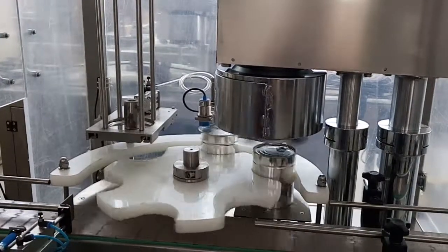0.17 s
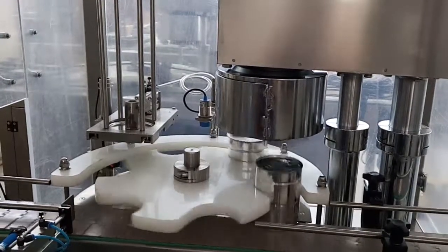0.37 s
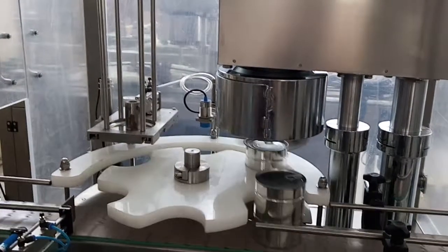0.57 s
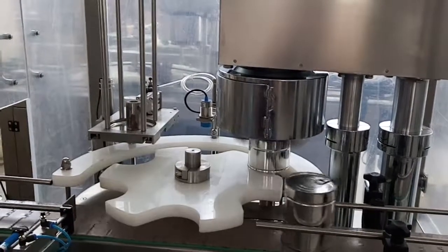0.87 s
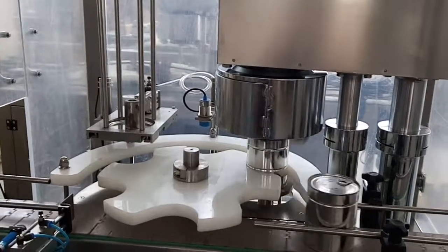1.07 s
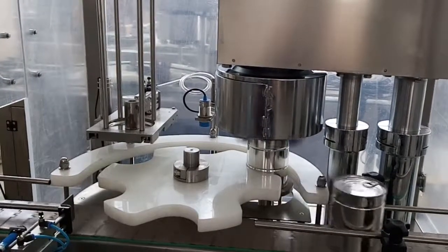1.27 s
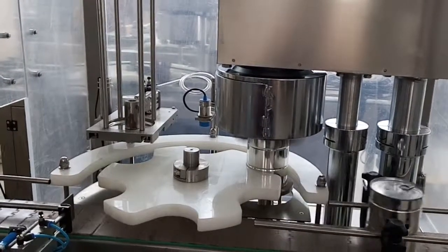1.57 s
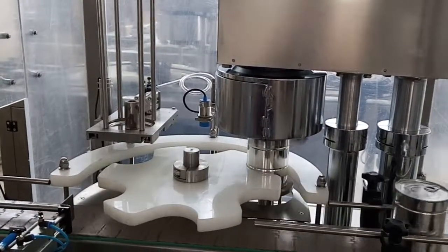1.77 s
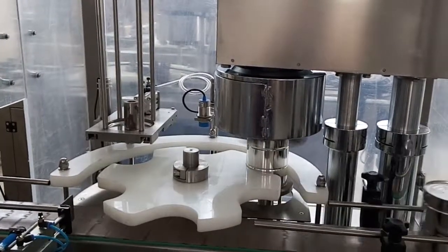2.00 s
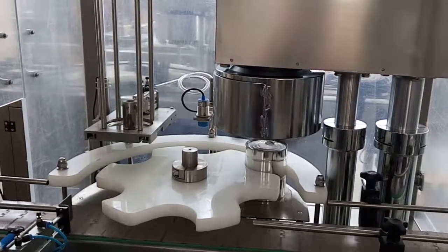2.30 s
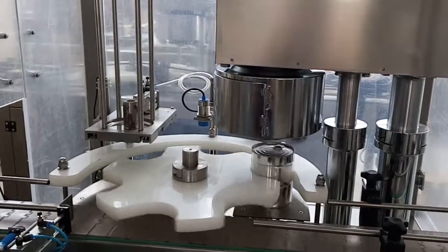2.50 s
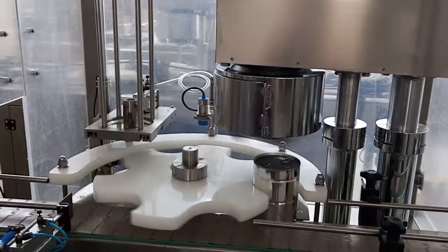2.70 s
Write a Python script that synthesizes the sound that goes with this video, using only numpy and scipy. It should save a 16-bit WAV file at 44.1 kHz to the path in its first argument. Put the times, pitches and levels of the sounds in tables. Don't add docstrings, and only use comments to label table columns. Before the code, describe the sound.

A can seaming machine whirs steadily with motor hum, chatter and air hiss in a reverberant factory hall. Thuds open it; scraping knocks and rim pings come at 0.7 s, a short squeal at 1.3, softer knocks around 1.6. At 2.1 s a can drops with a loud clack, low boom and rattling bounces until 2.4; a squeal follows at 2.6, then a knock and chirp near 2.75.

```python
import sys
import numpy as np
from scipy import signal
from scipy.fft import rfft, irfft, next_fast_len
from scipy.io import wavfile
from scipy.ndimage import uniform_filter1d, map_coordinates

SR = 44100
rng = np.random.default_rng(int(sys.argv[2]) if len(sys.argv) > 2 else 0)


def linear_from_db(decibels):
    return 10 ** (np.asarray(decibels, float) / 20)


def pcm_store(signal):
    levels = np.round(np.clip(np.atleast_2d(signal), -1, 1) * 32767)
    wavfile.write(sys.argv[1], SR, levels.astype(np.int16).T)


N = 125685


def unit(x):
    return x / np.sqrt(np.mean(x ** 2) + 1e-20)


def along(points, hz):
    f, v = np.transpose(points)
    return np.interp(np.log(hz + 1), np.log(f + 1), v)


def curves(rows):
    s, *cols = np.transpose(rows)
    return [np.interp(np.arange(N) / SR, s, c) for c in cols]


def wobble(rate_hz):
    return map_coordinates(rng.standard_normal(int(N * rate_hz / SR) + 4), [np.arange(N) * rate_hz / SR])


def filtered(x, response):
    m = next_fast_len(x.shape[-1] + SR // 2)
    return irfft(rfft(x, m) * response(np.fft.rfftfreq(m, 1 / SR)), m)[..., :x.shape[-1]]


def shaped(x, tone):
    return unit(filtered(x, lambda hz: linear_from_db(along(tone, hz))))


def patchy(patchy_db):
    z = signal.stft(rng.standard_normal((2, N)), nperseg=512)[2]
    field = uniform_filter1d(rng.standard_normal(z.shape[1:]), size=5, axis=0)
    field = uniform_filter1d(field, size=10, axis=1)
    return signal.istft(z * linear_from_db(patchy_db * unit(field)), nperseg=512)[1][:, :N]


def ring(modes, t):
    hz, db, t60_s = np.transpose(modes)[:, None, :, None]
    level_db, detune, phase = rng.standard_normal((3, 2, len(modes), 1))
    walk = np.cumsum(rng.standard_normal((2, len(modes), len(t))), axis=2)
    drift = 0.95 * walk * hz / np.sqrt(20000 * SR)
    spread_rad = [[[.3]], [[2]]]
    tone = np.sin(2 * np.pi * hz * (1 + 0.0035 * detune) * t + drift + phase * spread_rad)
    return (linear_from_db(db + level_db - 60 * t / t60_s) * tone).sum(axis=1)


def rise(t, rise_s):
    return 1 - np.exp(-t / rise_s)


def place(out, s, sound):
    out[:, round(s * SR):][:, :sound.shape[-1]] += sound


# (time [s], whir level [dB], hiss level over its mean [dB])
MACHINE_LOAD = [(0, -29, -1.5), (.2, -30, 0), (.33, -31.5, 2.5), (.5, -30.5, 2), (.85, -31.5, -1.5),
                (1.21, -32, 0.5), (1.69, -32, 0.5), (1.95, -30, 0.5), (2.32, -27, 1), (2.5, -30.5, 1.5),
                (2.85, -30, -1)]
# (frequency [Hz], density [dB per Hz])
RUMBLE_TONE = [(15, -67.5), (25, -23.5), (102, 0), (224, -3.5), (408, -6.5), (537, -9), (810, -9.5),
               (1240, -24), (1500, -17), (1950, -52), (3300, -120)]
# (frequency [Hz], density [dB per Hz])
HISS_TONE = [(1100, -11), (1970, -1), (3350, -1.5), (5370, 0.5), (6700, -12), (7300, -49), (7800, -66.5),
             (15500, -120)]
# (frequency [Hz], width [Hz], level [dB])
FRAME_MODES = [(101, 15, -5.5), (200.4, 6.7, 0.5), (296, 22, 7), (410.8, 24, 10), (624, 58, -2),
               (724, 23, 2.5), (785, 14, -18), (1150, 32.6, -2.5), (2520, 470, -3)]


def frame_response(f):
    total = 0
    for k, (center, width, db) in enumerate(FRAME_MODES):
        total = total + (-1) ** k * linear_from_db(db) * 1j * f * width / (center * center - f * f + 1j * f * width)
    return total


def chain_response(f):
    chain = .3j * f * 1500 / (2400 ** 2 - f * f + 1j * f * 1500)
    return (frame_response(f) + chain) / (1 + (f / 5500) ** 6)


def machine():
    load_db, hiss_db = curves(MACHINE_LOAD)
    rumble = shaped(patchy(2.17), RUMBLE_TONE)
    frame = unit(filtered(patchy(3.1), frame_response))
    hits = rng.random(N) < 120 / SR
    hit_db = 9.5 * np.minimum(rng.exponential(size=N), 2)
    chatter = unit(filtered(hits * linear_from_db(hit_db) * rng.choice([-1, 1], (2, N)), chain_response))
    hiss = shaped(patchy(1.68), HISS_TONE)
    low = linear_from_db(2) * rumble + linear_from_db(-3.5 + 0.6 * wobble(3.8)) * frame + linear_from_db(-17) * chatter
    return linear_from_db(load_db + 0.71 * wobble(11.51)) * low + linear_from_db(-31 + hiss_db + 0.91 * wobble(8.8)) * hiss


# (time [s], level [dB])
GEAR_HUM = [(0, -37), (.25, -41), (.49, -33), (.57, -40), (.66, -35), (1.1, -36), (1.4, -41), (2.75, -37)]


def hum():
    mesh_hz = 190.8
    db, = curves(GEAR_HUM)
    phase = 2 * np.pi * np.cumsum(mesh_hz + 4 * wobble(15)) / SR
    tone = np.sin(phase) + .35 * np.sin(phase / 2)
    return linear_from_db(db + 3 * wobble(14)) * tone * [[1.3], [1.3]]


# (time [s], level [dB])
VENTING = [(0, -51), (.22, -48.5), (.3, -41.5), (.38, -41), (.44, -45), (.6, -48.5), (.95, -49.5),
           (1.17, -46), (1.68, -48), (1.75, -43), (2.05, -48), (2.11, -39), (2.3, -42), (2.5, -44.5),
           (2.85, -43.5)]
# (frequency [Hz], density [dB per Hz])
VENT_TONE = [(6000, -40), (6900, 4), (7700, 3), (8800, 0), (11000, -1), (13000, -2), (14300, -4.5),
             (15400, -7)]


def air():
    nozzle_hz, nozzle_db = 10422, -66
    db, = curves(VENTING)
    hiss = unit(filtered(patchy(1)[0], lambda hz: linear_from_db(along(VENT_TONE, hz)) * (hz > 6000)))
    phase = 2 * np.pi * np.cumsum(nozzle_hz + 6 * wobble(30)) / SR
    return linear_from_db(db) * hiss + linear_from_db(nozzle_db + 4 * wobble(12)) * np.sin(phase)


# (time [s], thud level [dB], thud pitch [Hz], scrape level [dB])
WHEEL_KNOCKS = [(0.001, -8, 274, -35.5), (0.008, -13, 453, -35), (0.014, -18, 652, -40.5),
                (0.285, -15.5, 685, -33), (0.468, -20, 710, -33), (0.72, -21.5, 592, -20.5),
                (0.73, -12, 282, -26), (0.737, -11.5, 275, -26), (1.533, -19.5, 223, -31),
                (1.585, -12, 176.4, -46.5), (1.627, -30, 330, -30.5), (1.757, -42.5, 403, -26.5),
                (2.198, -13.5, 435, -37), (2.222, -9, 187, -39), (2.288, -17.5, 407, -28),
                (2.311, -10, 227, -38.5), (2.342, -8, 449, -35.5), (2.6, -16, 724, -47),
                (2.728, -27.5, 314, -23), (2.74, -19, 210, -42)]
# (multiple of thud pitch [1], level [dB], t60 [s])
THUD_MODES = [(1, 1, 0.05), (1.55, -10, 0.045), (2.4, -12, .04)]
# (frequency [Hz], level [dB])
SCRAPE_TONE = [(1200, -9), (1900, -10), (2500, -1.5), (3300, -8.5), (4300, -9.5), (6000, -8.5), (7300, -46),
               (15000, -53.5)]


def wheel():
    scrape_t60_s, rise_s = 0.21, .004
    out, t = np.zeros((2, N + SR)), np.arange(SR // 5) / SR
    for s, thud_db, thud_hz, scrape_db in WHEEL_KNOCKS:
        grain_db = 2.7 * rng.standard_normal(len(t) // 64 + 1).repeat(64)[:len(t)]
        grains = rng.standard_normal((2, len(t))) * linear_from_db(grain_db)
        scrape = linear_from_db(scrape_db - 60 * t / scrape_t60_s) * shaped(grains, SCRAPE_TONE)
        thud = linear_from_db(thud_db) * ring([(k * thud_hz, db, t60_s) for k, db, t60_s in THUD_MODES], t)
        place(out, s, (thud + scrape) * rise(t, rise_s))
    return out[:, :N]


# (time [s], pitch [Hz], level [dB])
SQUEAL_TRACKS = [
    [(1.262, 2934, -43), (1.28, 2913, -21), (1.302, 2895, -18), (1.322, 2895, -30), (1.35, 2905, -32),
     (1.378, 2915, -38), (1.395, 2916, -50)],
    [(2.548, 2985, -38), (2.58, 2940, -29), (2.592, 2918, -15), (2.626, 2909, -13), (2.662, 2890, -20),
     (2.679, 2878, -28), (2.692, 2875, -24), (2.74, 2885, -26), (2.754, 2880, -44)],
    [(0.415, 4522, -46), (0.428, 4522, -34), (0.462, 4522, -40), (0.482, 4522, -33), (0.527, 4522, -31),
     (0.542, 4522, -43), (0.6, 4522, -38), (0.665, 4522, -37), (0.682, 4522, -47)],
    [(0.51, 2675, -50), (0.54, 2675, -39), (0.63, 2675, -45), (0.68, 2675, -35), (0.72, 2675, -37),
     (0.748, 2640, -34), (0.8, 2660, -36), (0.83, 2675, -45), (1.1, 2675, -44)],
    [(2.775, 2430, -46), (2.783, 2425, -30), (2.814, 2425, -32), (2.822, 2422, -42), (2.83, 2420, -33),
     (2.842, 2420, -47)],
]
# (side over mid [dB], share in phase with mid [1])
SQUEAL_PLACES = [(-6, 0.6), (1.5, 0.5), (8, -0.5), (-6.5, .3), (-3, .2)]


def squeals():
    slip_hz, slip_db, fade_s = 5, 1.3, .02
    out = np.zeros((2, N))
    for rows, (side_db, share) in zip(SQUEAL_TRACKS, SQUEAL_PLACES):
        first, last = rows[0], rows[-1]
        hz, db = curves([(first[0] - fade_s, first[1], -90), *rows, (last[0] + fade_s, last[1], -90)])
        phase = 2 * np.pi * np.cumsum(hz + slip_hz * wobble(60.07)) / SR
        lag = np.arccos(np.clip(share, -1, 1))
        pair = [np.sin(phase), linear_from_db(side_db) * np.sin(phase + lag)]
        out += np.sqrt(2) * linear_from_db(db + slip_db * wobble(70)) * pair
    return out


# (time [s], level [dB], pitch [Hz])
RIM_TICKS = [(.7225, -15.5, 4130), (.727, -19.5, 4850), (.7355, -20.5, 3110), (.746, -18, 2696),
             (.755, -21.5, 4430), (.789, -20, 2700), (1.624, -24.5, 1594), (1.757, -22, 2260),
             (1.762, -18.5, 1924), (2.274, -18.5, 2390), (2.283, -25.5, 2690), (2.73, -29, 1900),
             (2.7355, -17, 2370), (2.736, -25, 5370)]


def ticks():
    t60_s = 0.039
    out, t = np.zeros((2, N + SR)), np.arange(SR // 20) / SR
    for s, db, hz in RIM_TICKS:
        ping = ring([(hz, 0, t60_s), (1.47 * hz, -14, t60_s / 2)], t)
        place(out, s, linear_from_db(db) * ping * rise(t, .0015))
    return out[:, :N]


# (time [s], peak level [dB], tilt [dB per octave], ring over crack [dB])
BOUNCES = [(2.094, 1.5, 1, 0.5), (2.112, -11, 3.5, -17.5), (2.132, -10.5, 2.5, 3), (2.143, -15.5, -2.5, 4),
           (2.172, -19.5, -4, 2.5), (2.2, -15.5, -1, -9.5), (2.222, -23.5, -2, -1.5), (2.274, -14, 4, 5),
           (2.284, -6, -2, -3), (2.312, -14, 1.5, -11.5), (2.338, -15, -3.5, -13), (2.38, -29, -6, -10)]
# (frequency [Hz], level [dB], t60 [s])
CAN_MODES = [(240, -13, 0.07), (330, 5, 0.061), (435, -4.5, 0.089), (724, 5, .11), (1192, -13, .15),
             (1226, -8, .16), (1706, -9, .12), (2530, -12, .16), (2940, -13, .14), (2120, -16.5, .14),
             (2540, -23.5, 0.15), (4470, -20, .1), (4880, -34.5, 0.088), (5520, -15.5, 0.12)]
# (frequency [Hz], level [dB])
CRACK_TONE = [(150, -7), (400, 10), (720, 1), (1000, -19.5), (2500, -18), (5500, -8.5), (7200, -19.5),
              (16000, -66.5)]
# (time [s], level [dB])
LIFTER_STOPS = [
    (2.14, -15),
    (2.325, -25),
]


def can_drop():
    crack_db, crack_t60_s, clatter_db, clatter_t60_s = -9, 0.031, -1, 0.13
    thump_hz = 150
    can_side_db = 4.5
    stop_hz, stop_t60_s = 104, 0.17
    out, t = np.zeros((2, N + SR)), np.arange(SR // 4) / SR
    burst = linear_from_db(crack_db - 60 * t / crack_t60_s) + linear_from_db(clatter_db - 60 * t / clatter_t60_s)
    for s, db, tilt_db, ring_db in BOUNCES:
        def crack_response(hz):
            tilted_db = along(CRACK_TONE, hz) + tilt_db * np.log2(hz / 700 + 0.087)
            return linear_from_db(tilted_db) / (1 + (thump_hz / (hz + 1)) ** 2)
        crack = burst * unit(filtered(rng.standard_normal((2, len(t))), crack_response))
        modes = [(hz, level + tilt_db * np.log2(hz / 700), t60_s) for hz, level, t60_s in CAN_MODES]
        can = linear_from_db([[ring_db], [ring_db + can_side_db]]) * ring(modes, t)
        place(out, s, linear_from_db(db - 12.0) * (can + crack) * rise(t, 0.0019))
    for s, db in LIFTER_STOPS:
        boom = linear_from_db(db - 60 * t / stop_t60_s) * np.sin(2 * np.pi * stop_hz * t)
        place(out, s, boom * rise(t, 0.0056))
    return out[:, :N]


def wash():
    wash_db, wash_t60_s = -21, 1
    t = np.maximum(np.arange(N) / SR - BOUNCES[0][0], 0)
    return linear_from_db(wash_db - 60 * t / wash_t60_s) * rise(t, 0.0044) * shaped(patchy(1.9), SCRAPE_TONE)


# (frequency [Hz], t60 [s])
HALL_T60 = [(150, 0.3), (1000, 0.99), (4000, 1), (12000, 0.37)]


def hall(pair, wet_db):
    hz, t, z = signal.stft(rng.standard_normal((2, SR)), SR, nperseg=256)
    tail = signal.istft(z * linear_from_db(-60 * t / along(HALL_T60, hz)[:, None]), SR, nperseg=256)[1]
    delayed = np.pad(pair, ((0, 0), (300, 0)))
    return pair + linear_from_db(wet_db) * signal.fftconvolve(delayed, tail / np.linalg.norm(tail[0]), axes=1)[:, :N]


# (frequency [Hz], side over mid [dB])
PORT_WIDTH = [(60, -19.5), (300, -18.5), (830, -14), (1400, -5), (2400, -3), (4000, 2.5), (6500, 10.5),
              (7300, 7)]
# (frequency [Hz], correlation [1])
PORT_LEAN = [(100, -0.74), (500, -0.2), (1200, -0.028), (2800, 0.13), (3600, 0.087), (5500, -0.79),
             (8000, 0.49)]


def ports(pair):
    def side_response(hz):
        lean = np.clip(along(PORT_LEAN, hz), -.95, .95)
        return linear_from_db(along(PORT_WIDTH, hz)) * [lean, np.sqrt(1 - lean ** 2)]
    mid = filtered(pair[0], lambda hz: linear_from_db(-10 * (hz > 7300)))
    return np.array([mid, filtered(pair, side_response).sum(axis=0)])


def scene():
    struck = can_drop() + wheel() + ticks() + wash()
    mid, side = ports(machine() + hall(struck, -10.5) + hum()) + hall(squeals(), -20)
    side = side + air()
    return np.array([mid + side, mid - side])


def roll_off(x):
    return signal.sosfilt(signal.butter(12, 15480, fs=SR, output="sos"), x)


def record(dry):
    mix = dry / (1 + np.abs(dry / 1.05) ** 6) ** (1 / 6)
    return roll_off(mix)


dry = scene()
out = record(dry)
pcm_store(out)
```